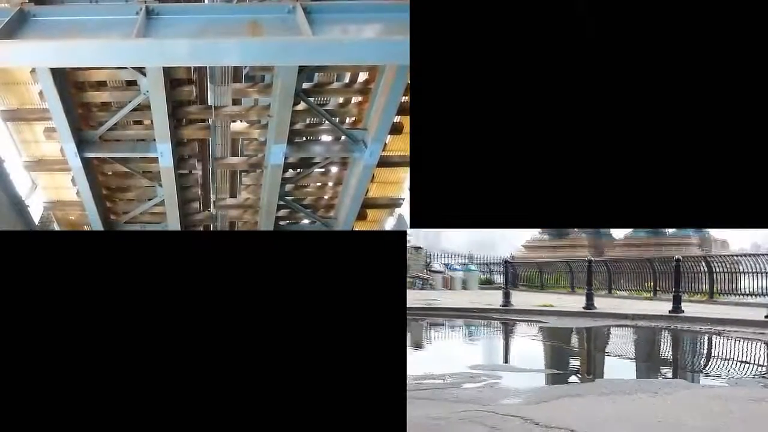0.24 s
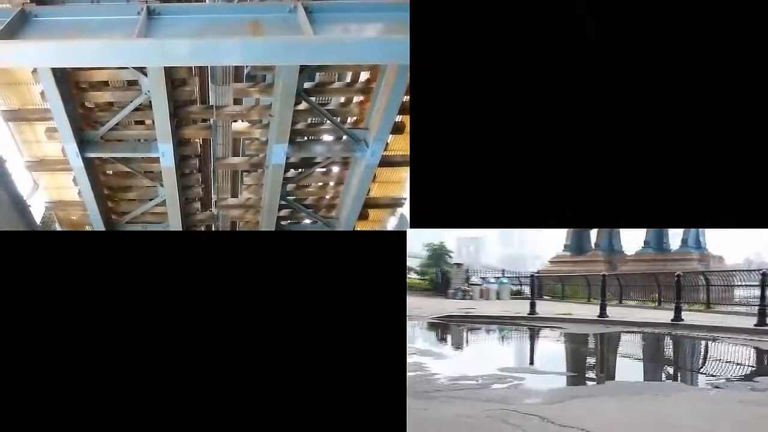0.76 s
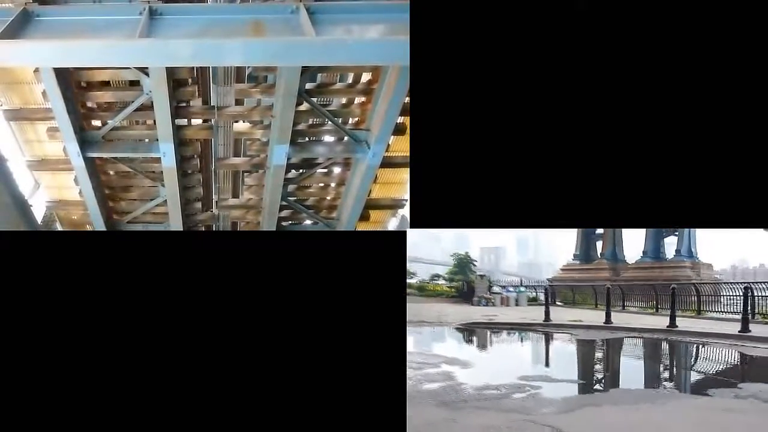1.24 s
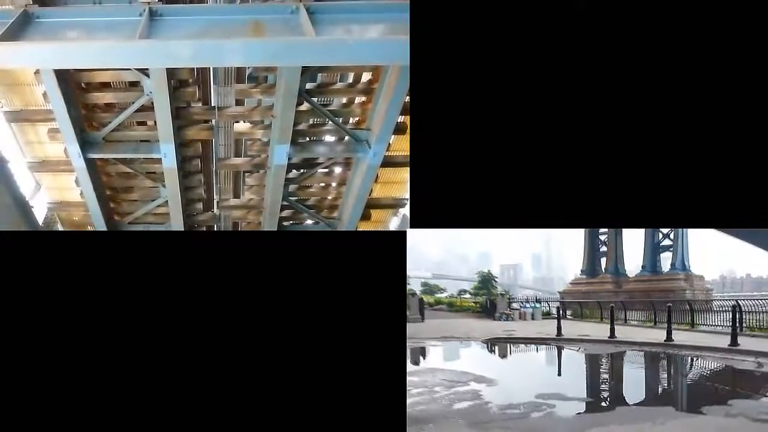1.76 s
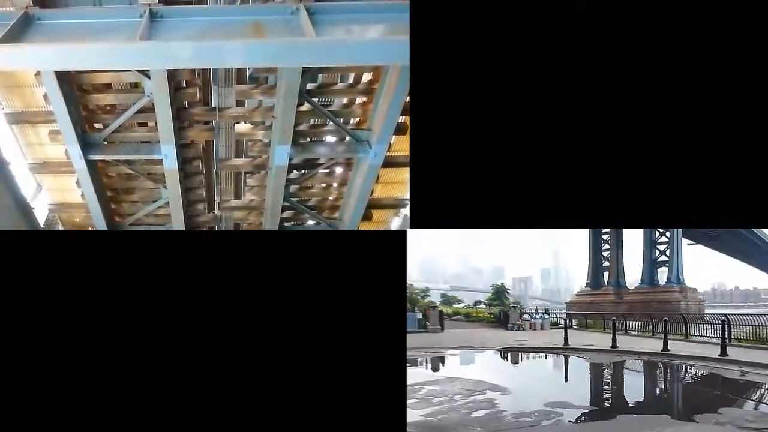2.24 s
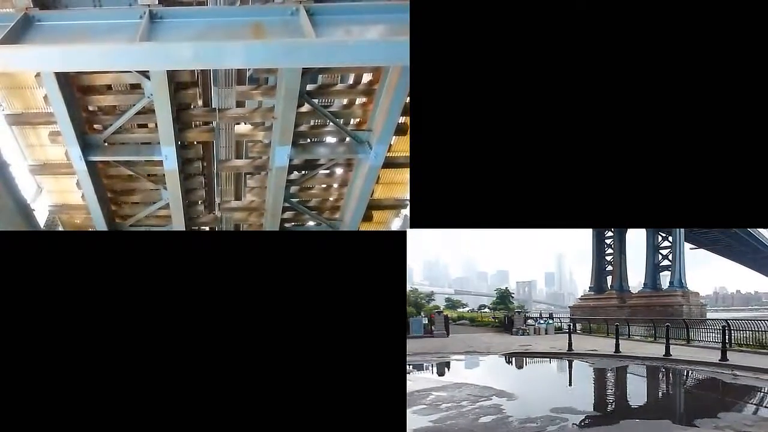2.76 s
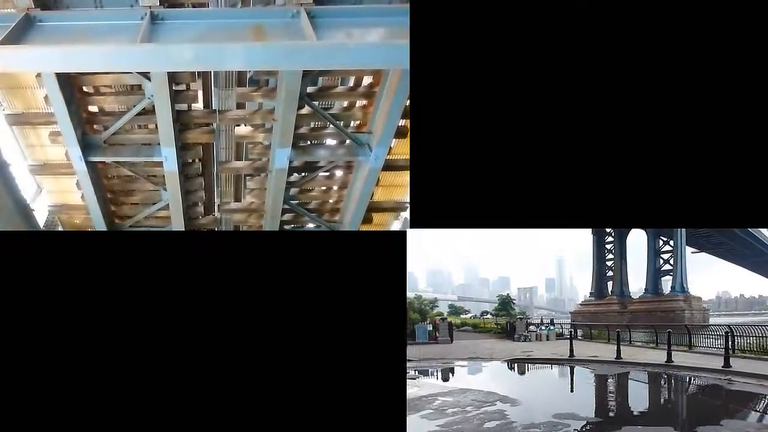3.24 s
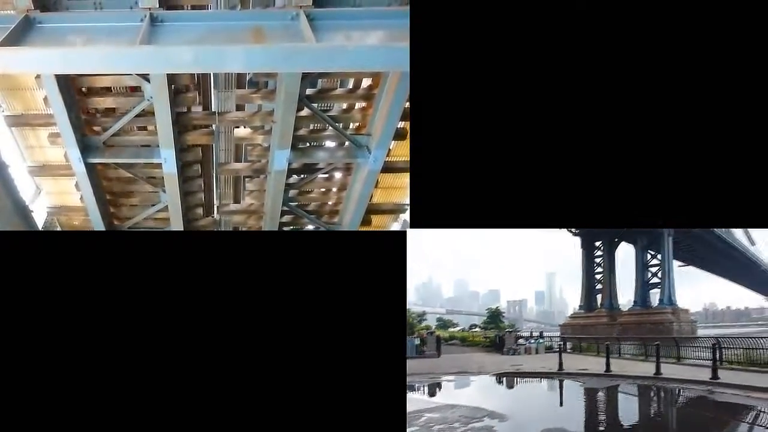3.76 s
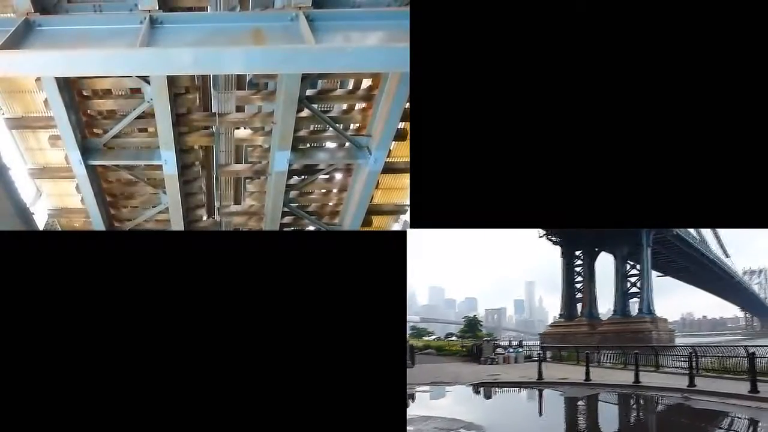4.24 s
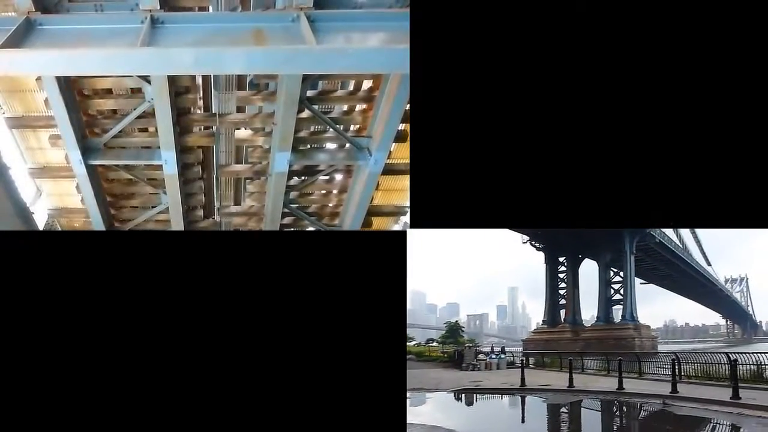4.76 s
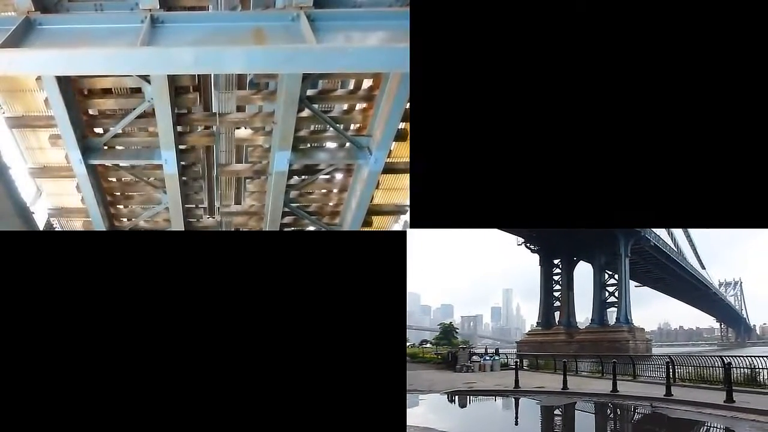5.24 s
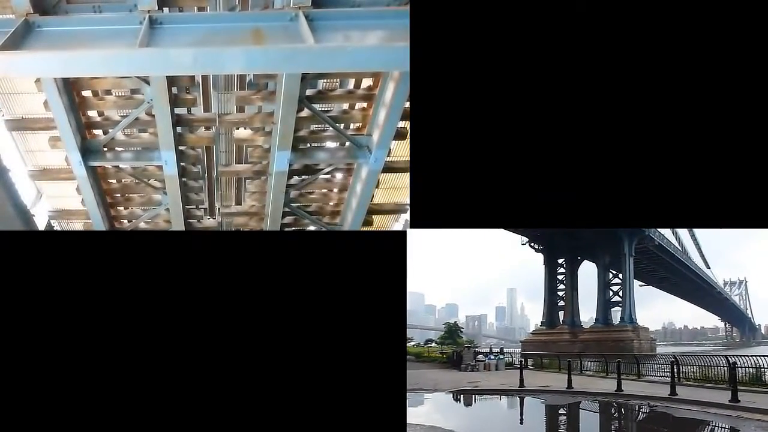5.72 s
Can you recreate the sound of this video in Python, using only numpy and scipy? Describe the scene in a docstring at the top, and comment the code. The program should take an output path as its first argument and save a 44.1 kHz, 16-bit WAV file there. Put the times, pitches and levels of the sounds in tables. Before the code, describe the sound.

A continuous, heavy low-mid roar of a train on steelwork fills the space above a stereo microphone on the ground. Frequent uneven joint blows, often in pairs, bring dull thumps, metallic clanks and short rattles. Low plates ring between them over girder boom and rail hiss. A wavering whine grows clearer as it drops in pitch; late on the roar softens a little, with a short wheel note and two quick ticks toward the left.

```python
"""Subway train on a steel bridge

A train crosses overhead, heard from the ground under the deck. Filtered noise makes the girders' boom and
the rails' hiss; dense random knocks make the deck's roar, and short rings make the loose fittings' rattle.
Bursts of noise thump and clank at the rail joints, decaying tones are booming plates, and a faint gear
whine sinks in pitch throughout. Late on, narrow noise bands are singing wheels and a dry double tick sounds."""
import sys
import numpy as np
from scipy import signal
from scipy.fft import rfft, irfft
from scipy.io import wavfile
from scipy.ndimage import uniform_filter1d

SR = 44100
rng = np.random.default_rng(int(sys.argv[2]) if len(sys.argv) > 2 else 0)


def generate_wav(sig):
    """Save sig (samples, or channels by samples) to the path in sys.argv[1] as 16-bit PCM at SR."""
    pcm = np.round(np.clip(np.atleast_2d(sig).T, -1, 1) * 32767).astype(np.int16)
    wavfile.write(sys.argv[1], SR, pcm)


N = 264159
TIME = np.arange(N) / SR  # seconds
FREQ = np.maximum(np.arange(N // 2 + 1) * SR / N, 1)  # Hz, kept above zero for the logarithm


def undb(db):
    """Turn decibels into gain."""
    return 10 ** (np.asarray(db) / 20)


def unit(x):
    """Scale to an average strength (rms) of one."""
    return x / np.sqrt(np.mean(x ** 2))


def even(x, span_s):
    """Scale to an rms of one within every span, so that the sound has no surges of its own."""
    power = uniform_filter1d(x ** 2, max(int(span_s * SR), 1), axis=-1)
    return x / np.sqrt(np.maximum(power, 1e-18))


def response(points):
    """Gain at every frequency, drawn through (Hz, dB) points."""
    hz, db = np.transpose(points)
    return undb(np.interp(np.log(FREQ), np.log(hz), db))


def shape(x, gain):
    """Filter a sound by a gain per frequency."""
    return irfft(rfft(x) * gain, N)


def resonance(hz, width_hz):
    """Complex gain of one damped vibration, equal to one at its centre."""
    return 1 / (1 + 1j * (FREQ / hz - hz / FREQ) * hz / width_hz)


def walk(rate):
    """Random levels, held 1 / rate seconds and smoothed twice; their spread is near one."""
    hold = max(int(SR / rate), 1)
    steps = np.repeat(rng.standard_normal(N // hold + 1), hold)
    smooth = uniform_filter1d(uniform_filter1d(steps, hold), hold)
    return 0.661 * smooth[:N]


def noise():
    """Two unrelated noises: what arrives from straight above, and from the sides."""
    return rng.standard_normal((2, N))


def decay(age, t60):
    """Dying away by 60 dB in t60 seconds."""
    return np.exp(-np.log(1000) * age / t60)


def ring(start, rise_s, t60):
    """Envelope of a blow that builds up in the steelwork and dies away."""
    age = np.maximum(TIME - start, 0)
    return (1 - np.exp(-(age / rise_s) ** 2)) * decay(age, t60)


def knocks(rate, spread_db, t60):
    """Many small random impacts; each frees a burst of scattered sound, and their energies add."""
    strength = undb(spread_db * np.minimum(rng.exponential(size=N), 4))
    hits = (rng.random(N) < rate / SR) * strength
    tail = decay(TIME, t60)
    energy = np.abs(shape(hits ** 2, rfft(tail ** 2)))
    return unit(noise() * np.sqrt(energy))


def load(share=1):
    """The train's load as a gain over time, for a layer that follows this share of its swing in dB."""
    # how hard the train shakes the span; it eases as the last cars draw away: time_s [s], load_db [dB]
    load_points = [(0.0, 1.3), (0.5, 0.96), (1.3, 0), (2.5, 0.56), (3.7, -0.7), (4.7, -0.5), (5.1, -0.9),
                   (5.4, -3.5), (5.65, -2.5), (6.0, -3)]
    times, db = np.transpose(load_points)
    return undb(share * np.interp(TIME, times, db))


def ticks():
    """Two sharp, dry ticks: single clicks through broad resonances, louder on the left."""
    # the two ticks: start_s [s], level_db [dB], centre_hz [Hz], width_hz [Hz]
    tick_list = [(5.9496, 7, 5200, 4800), (5.9553, 1, 7000, 22000)]
    # a short, low ring gives each tick its body
    body = undb(-7) * resonance(hz=1500, width_hz=1600)
    out = 0
    for start, db, hz, width_hz in tick_list:
        click = 1. * (np.arange(N) == int(start * SR))
        out = out + undb(db) * shape(click, resonance(hz, width_hz) - body)
    return out * undb([[1.4], [-2.6]])  # left and right, dB


def gears(count=5, detune=.03, waver=.006, flutter_db=3, second_db=-12):
    """Several axles' drive gears whine, each at its own pitch as wheels wear unequally, slowly sinking."""
    # the whine as the driven axles pass: time_s [s], hum_db (fundamental) [dB], fourth_harmonic_db [dB]
    whine_levels = [(0.0, -54, -61), (1.2, -45, -55), (2.3, -44, -60), (2.8, -45, -57), (3.4, -38, -49),
                    (4.0, -42, -56), (4.45, -37, -48), (5.2, -38.5, -54), (5.5, -35.5, -49),
                    (6.0, -41, -51)]
    times, hum_db, overtone_db = np.transpose(whine_levels)
    hum_gain = undb(np.interp(TIME, times, hum_db))
    overtone_gain = undb(np.interp(TIME, times, overtone_db))
    middle_hz = 985 - 36 * TIME  # falls 36 Hz every second
    out = 0
    # each gear starts at its own random point of the cycle, above and to the sides
    for wear, turn in zip(np.linspace(-1, 1, count), rng.random((count, 2, 1))):
        hz = middle_hz * (1 + detune * wear + waver * walk(70))
        phase = 2 * np.pi * (np.cumsum(hz) / SR + turn)
        hum = np.sin(phase) + undb(second_db) * np.sin(2 * phase)
        overtone = np.sin(4 * phase)
        out = out + hum_gain * unit(hum * undb(flutter_db * walk(19)))
        out = out + overtone_gain * unit(overtone * undb(flutter_db * walk(13)))
    return out / np.sqrt(count)


def wheels(fade_s=0.042):
    """Rubbing on the rail makes the wheel discs sing briefly in wavering narrow bands."""
    # singing notes: start_s [s], end_s [s], pitch_hz [Hz], width_hz [Hz], level_db [dB]
    # a note that would end before it starts stays silent
    wheel_notes = [(4.21, 4, 3360, 130, -43), (4.76, 4.92, 3440, 69.7, -48), (5.6, 6.7, 2130, 130, -64),
                   (5.67, 5.83, 1330, 250, -37)]
    out = 0
    for start, end, hz, width_hz, db in wheel_notes:
        rubbing = np.clip(np.minimum(TIME - start, end - TIME) / fade_s, 0, 1)
        note = even(shape(noise(), resonance(hz, width_hz) ** 2), span_s=.1)
        out = out + note * rubbing * undb(db + 0.88 * walk(8.9))
    return out


def fittings(count=1500, t60=0.074, spread_db=1.5, level_db=-42):
    """Loose bolts and tie plates rattle at random, so densely that their short rings blend."""
    # lowest and highest note of the loose fittings: low_hz [Hz], high_hz [Hz]
    note_range = (598.5, 4520)
    low_hz, high_hz = note_range
    age = TIME[:int(t60 * SR)]
    out = np.zeros(N + len(age))
    for when, pitch, strength in rng.random((count, 3)):
        hz = low_hz * (high_hz / low_hz) ** pitch
        at = int(when * N)
        # a few hits are stronger, and higher notes are weaker
        size = undb(-spread_db * np.log(max(1 - strength, .05))) * np.sqrt(low_hz / hz)
        out[at:at + len(age)] += size * np.sin(2 * np.pi * hz * age) * decay(age, t60)
    return unit(out[:N]) * load() * undb(level_db)


def booms(waver=0.027, rise_s=0.0091, t60=0.17):
    """A jolted plate or beam rings briefly on its own low, slightly unsteady note."""
    # plates and beams that ring out of the roar: start_s [s], pitch_hz [Hz], level_db [dB]
    boom_list = [(0.105, 313.4, -22), (0.312, 276, -22), (0.445, 331.5, -17), (0.605, 301, -14),
                 (0.65, 380, -19), (0.745, 300.4, -22), (1.0, 338, -21), (1.05, 415, -21), (1.5, 343, -20),
                 (1.555, 296.4, -16), (1.87, 240, -28), (2.01, 52, -32), (2.025, 309.5, -20.5),
                 (2.32, 209, -20), (2.425, 212.8, -15.5), (2.485, 289, -20), (2.575, 227.5, -17),
                 (2.6, 329, -21.5), (2.765, 227, -19), (2.8, 348, -18), (2.965, 226, -12),
                 (3.225, 349, -16), (3.515, 343.7, -18.5), (4.6, 228, -22), (4.84, 236, -16.5),
                 (5.076, 333, -14), (5.905, 58.7, -26), (5.91, 174.2, -16), (5.958, 249.7, -11)]
    # a clock that runs slightly fast and slow makes the notes unsteady
    clock = TIME + waver * np.cumsum(walk(60)) / SR
    out = 0
    for (start, hz, db), turn in zip(boom_list, rng.random((len(boom_list), 2, 1))):
        note = np.sin(2 * np.pi * (hz * clock + turn))
        out = out + undb(db) * ring(start, rise_s, t60) * note
    return np.sqrt(2) * out  # gives a steady sine an rms of one


def joints(rise_share=0.033):
    """Each blow thumps deck, clanks rail and makes fittings clatter; longer rings have softer attacks."""
    # wheels striking rail joints, some in close pairs:
    # start_s [s], clatter_db [dB], thump_db [dB], clank_db [dB], ring_t60_s (time to fall 60 dB) [s]
    joint_blows = [(0.095, -33, -14.5, -24, 0.17), (0.29, -31, -19, -26, 0.36),
                   (0.35, -40, -23, -24.5, 0.47), (0.578, -35, -23, -16.5, 0.076),
                   (0.641, -40, -12, -17.5, 0.047), (0.74, -40, -19, -31, .25),
                   (0.789, -30, -22, -19, 0.04), (0.8, -28.5, -21, -29, 0.2),
                   (0.995, -29.5, -16, -25, 0.23), (1.045, -48, -31, -23, .25), (1.19, -42, -29, -26, .3),
                   (1.29, -32.5, -24, -39, 0.18), (1.499, -27, -27, -24, 0.55),
                   (1.511, -35, -22, -22, 0.037), (1.606, -39, -29, -24, 0.08),
                   (1.775, -32.5, -27, -24, 0.59), (1.845, -41, -29, -28, 0.12), (1.95, -36, -28, -23, .35),
                   (2.005, -31.5, -17, -24, 0.2), (2.19, -31, -28, -29, 0.61), (2.285, -40, -24, -28, 0.23),
                   (2.735, -32.5, -22.5, -27, 0.39), (2.955, -34, -21, -21.5, 0.38),
                   (3.2, -34.5, -21, -19.5, 0.39), (3.24, -32, -26, -26, 0.17), (3.285, -32, -32, -38, .14),
                   (3.513, -26.5, -22, -24, 0.44), (3.56, -37, -22.5, -28.5, 0.39),
                   (3.592, -39, -28, -22, 0.036), (3.801, -37, -21.5, -23.5, 0.4),
                   (3.859, -37, -20, -27, 0.17), (3.995, -41, -22, -28, 0.45),
                   (4.07, -33.5, -30, -31, 0.58), (4.256, -31.5, -28, -28, 0.67),
                   (4.56, -33.5, -17.5, -31, 0.4), (4.837, -26.5, -20, -22, 0.17),
                   (4.915, -32.5, -39, -28, 0.27), (5.082, -25, -17.5, -24, .09),
                   (5.17, -43, -25, -32, 0.18), (5.45, -39, -26, -29, 0.55),
                   (5.675, -29.5, -32, -25.5, 0.75), (5.755, -41, -30, -35, 0.89),
                   (5.925, -39, -18.5, -29, 0.43)]
    # loose fittings set clattering: pitch_hz [Hz], level_db [dB per Hz]
    clatter_spectrum = [(60, -44), (300, -37), (800, 1), (1600, 4.5), (3000, -1), (4600, -1.5),
                        (6500, -8.5), (9000, -22.5), (11000, -31), (13000, -50)]
    # the deck under one heavy blow: pitch_hz [Hz], level_db [dB per Hz]
    thump_spectrum = [(60, -19), (150, -2.5), (240, 3.5), (350, 5), (480, 2), (820, -29), (1100, -18),
                      (3000, -49), (12000, -92)]
    # the rail under one blow: pitch_hz [Hz], level_db [dB per Hz]
    clank_spectrum = [(200, -30), (400, -6), (520, 1.5), (700, 1), (880, -3), (1100, -10), (3000, -28),
                      (12000, -86)]
    clatter_level, thump_level, clank_level = np.zeros((3, N))
    for start, clatter_db, thump_db, clank_db, t60 in joint_blows:
        blow = ring(start, rise_share * t60, t60)
        clatter_level += undb(clatter_db) * blow
        thump_level += undb(thump_db) * blow
        clank_level += undb(clank_db) * blow
    rattling = knocks(rate=650, spread_db=0.8, t60=0.019)
    clatter = even(shape(rattling, response(clatter_spectrum)), span_s=0.028)
    thump = even(shape(noise(), response(thump_spectrum)), span_s=0.028)
    clank = even(shape(noise(), response(clank_spectrum)), span_s=0.015)
    return clatter_level * clatter + thump_level * thump + clank_level * clank


def rails(level_db=-32, load_share=0.86):
    """Rolling contact hisses; loose plates and fasteners chatter within it."""
    # what the rails radiate: pitch_hz [Hz], level_db [dB per Hz]
    rail_spectrum = [(100, -47), (400, 7), (900, 1), (1300, 3), (2000, -0.5), (3200, -4.5), (4600, -7.5),
                     (6000, -12), (7000, -19.5), (9000, -29), (11000, -35.5), (13000, -51)]
    hiss = noise() * undb(2.2 * walk(30))
    chatter = knocks(rate=280, spread_db=0.5, t60=0.1)
    rolling = unit(shape(hiss + undb(-11.5) * chatter, response(rail_spectrum)))
    return rolling * load(load_share) * undb(level_db)


def girders(level_db=-31):
    """The long beams boom under the moving load, now and then swelling."""
    # what the girders radiate: pitch_hz [Hz], level_db [dB per Hz]
    girder_spectrum = [(20, -37), (35, -30), (50, -9), (68, -11.5), (92, 2), (115, 3), (145, -0.5),
                       (190, -3.5), (320, -63), (1000, -88)]
    # swells of the boom: peak_s [s], half_width_s [s], rise_db [dB]
    swell_list = [(.47, .06, 2), (1.4, 0.056, 5), (1.73, 0.054, 4.5), (2.32, 0.089, 2), (3.15, 0.053, 3),
                  (4.0, 0.37, 3), (5.55, 0.12, 5), (5.84, 0.1, 4)]
    swell_db = sum(db * np.exp(-((TIME - peak) / width) ** 2) for peak, width, db in swell_list)
    boom = even(shape(noise(), response(girder_spectrum)), span_s=0.15)
    return boom * undb(level_db + swell_db)


def deck(level_db=-22):
    """Wheel and rail roughness hammers the deck plates in a dense stream of knocks."""
    # what the deck plates radiate: pitch_hz [Hz], level_db [dB per Hz]
    deck_spectrum = [(80, -24), (160, -3), (220, -0.5), (280, -1.5), (345, 1.5), (400, -5), (460, -3),
                     (620, -8), (810, -9.5), (1000, -18), (1600, -29), (3000, -30.5), (12000, -96)]
    blows = knocks(rate=1600, spread_db=-0.5, t60=0.067)
    roar = even(shape(blows, response(deck_spectrum)), span_s=0.099)
    return roar * load() * undb(level_db)


def scene():
    """Add up all layers in stereo: the bass arrives as one; the treble scatters from all along the span."""
    # how wide the sound is: pitch_hz [Hz], side_minus_mid_db [dB]
    width_points = [(30, -11), (100, -20), (250, -23), (500, -17), (1000, -11), (2000, -9), (4500, -6.5),
                    (8000, -13.5)]
    # which way the sound leans: pitch_hz [Hz], left_minus_right_db [dB]
    lean_points = [(60, -1.46), (1300, -1.54), (2400, -1.3), (4400, 1.7), (9000, 0.56)]
    background = gears() + wheels() + fittings() + booms()
    mid, side = background + joints() + rails() + girders() + deck()
    side = shape(side, response(width_points))
    lean = np.sqrt(response(lean_points))  # half the lean goes to each ear
    return np.array([shape(mid + side, lean), shape(mid - side, 1 / lean)])


def record(dry):
    """Hollow the treble, add the double tick, and cut off the top."""
    # the treble has a narrow hollow and fades out above it: pitch_hz [Hz], gain_db [dB]
    hollow_points = [(6900, 0), (7500, -5), (7800, -20), (8000, -38), (8200, -18), (8500, -6), (9100, 0),
                     (12600, 0), (13500, -20)]
    sound = shape(dry, response(hollow_points)) + ticks()
    top_cut = signal.ellip(8, .2, 70, 15800, fs=SR, output="sos")  # cuts above 15800 Hz
    return signal.sosfilt(top_cut, sound)


dry = scene()
out = record(dry)
generate_wav(out)
```